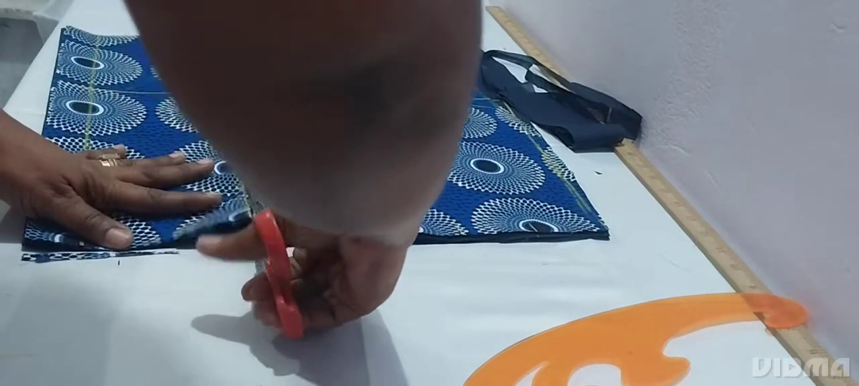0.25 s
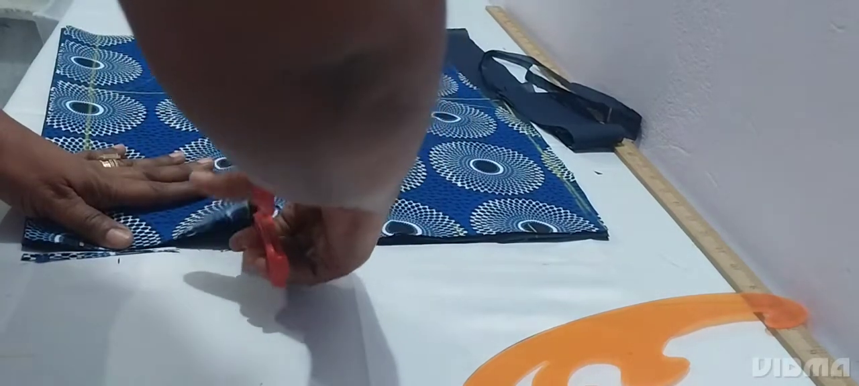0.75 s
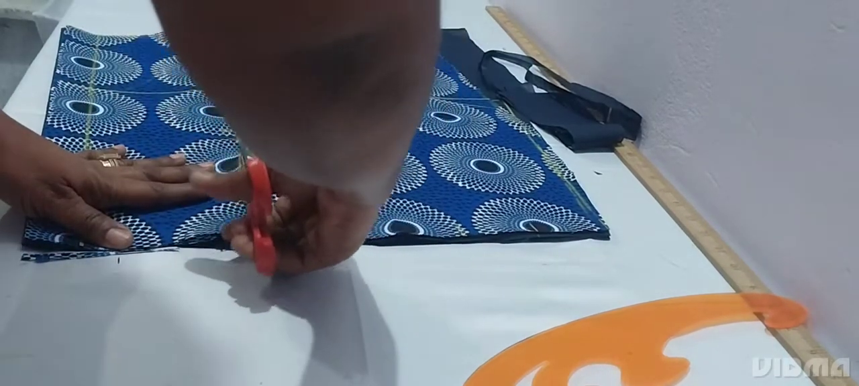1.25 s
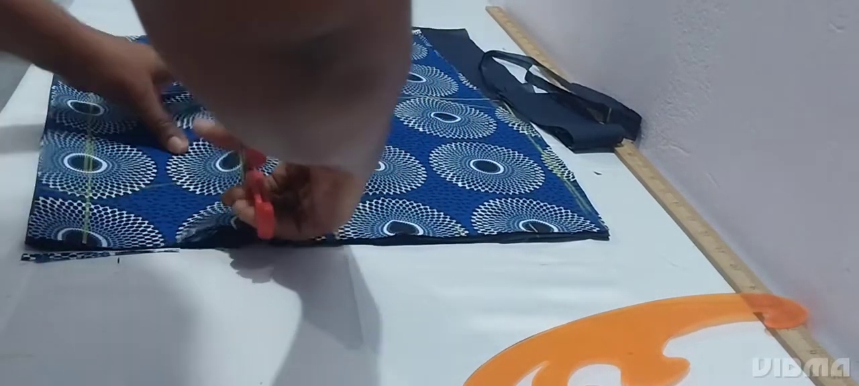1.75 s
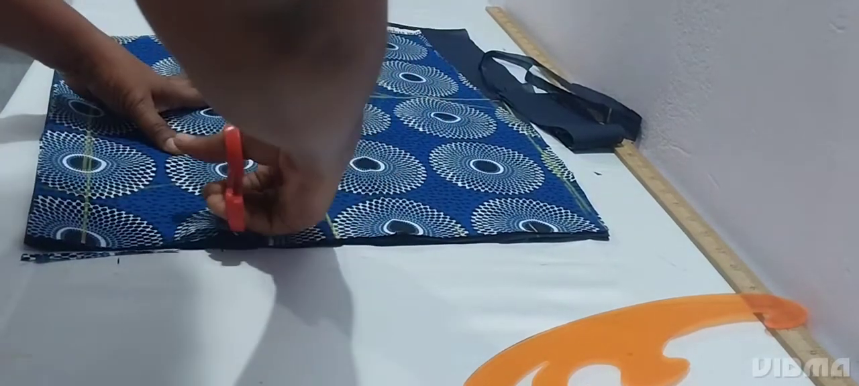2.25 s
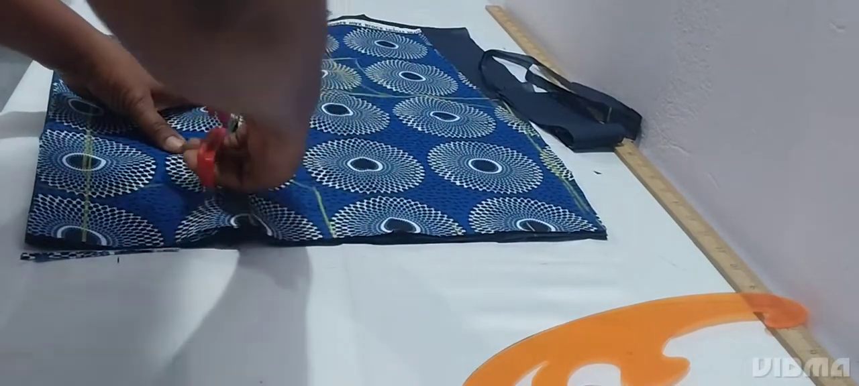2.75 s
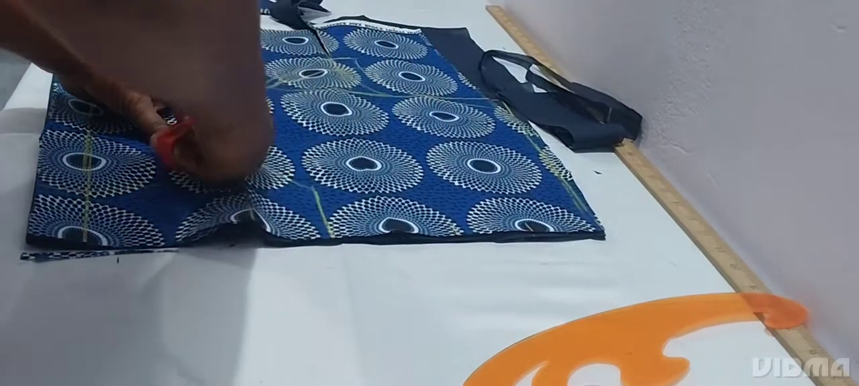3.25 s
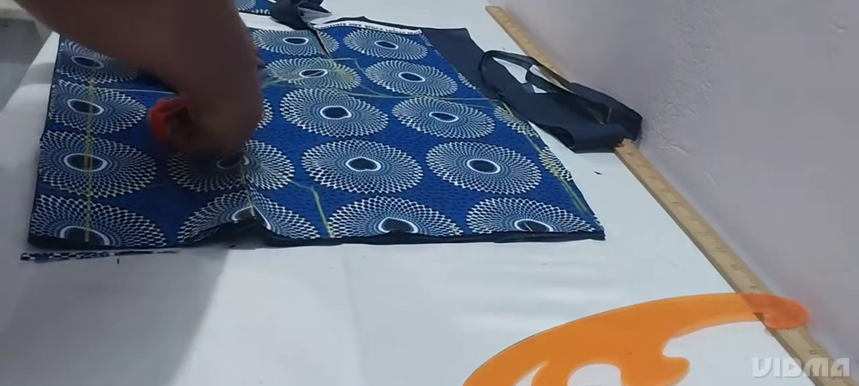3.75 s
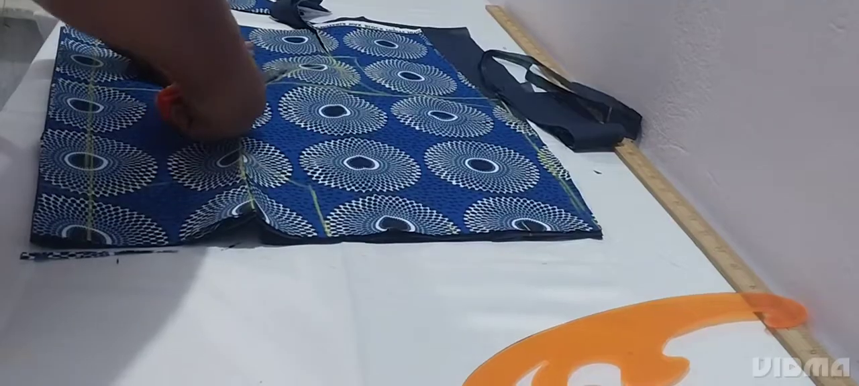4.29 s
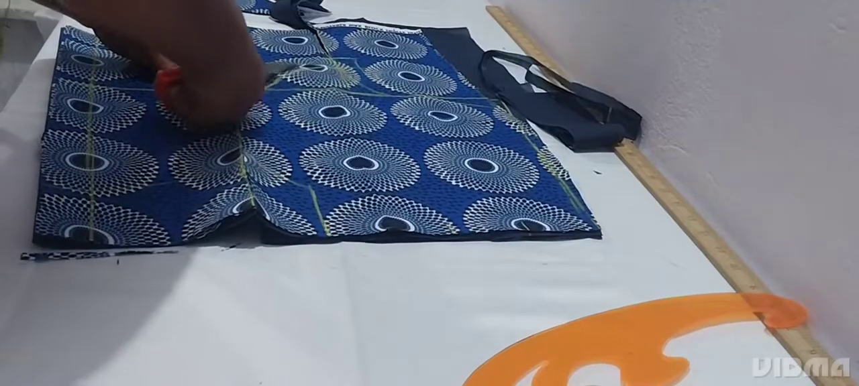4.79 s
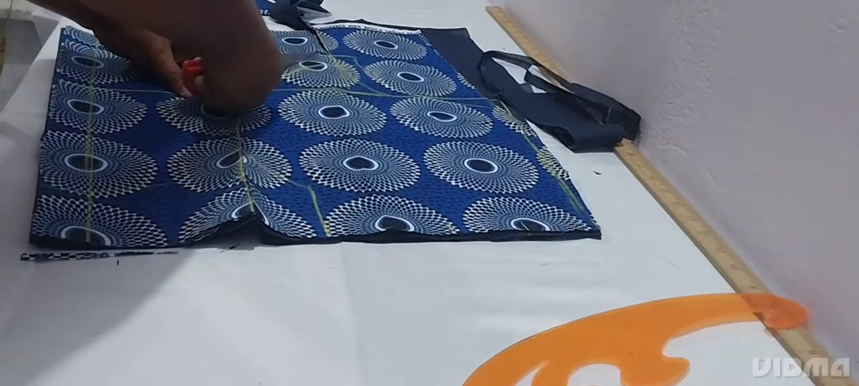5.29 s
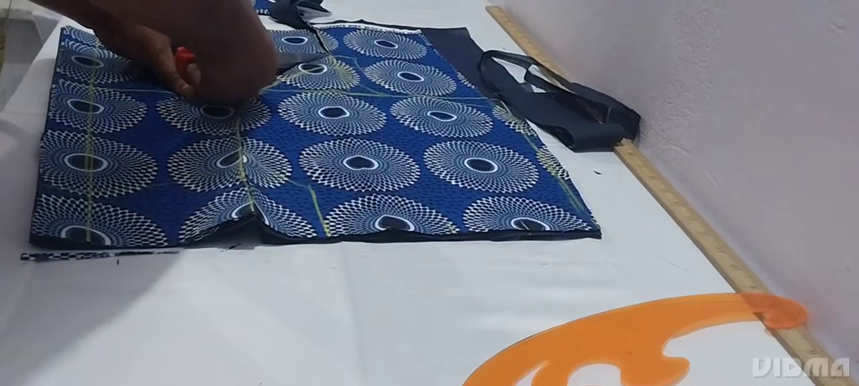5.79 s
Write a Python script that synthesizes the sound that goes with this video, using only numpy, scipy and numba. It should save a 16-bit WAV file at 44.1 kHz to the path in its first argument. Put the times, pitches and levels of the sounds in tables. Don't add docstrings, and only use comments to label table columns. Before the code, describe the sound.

Close, woody crunches of scissors cutting layered fabric on a tabletop, each followed by a faint blade slide, brisk and regular throughout.

```python
import sys
import numpy as np
from scipy import signal
from scipy.fft import rfft, irfft
from scipy.io import wavfile
from scipy.ndimage import uniform_filter1d, minimum_filter1d
from numba import njit

SR = 44100
rng = np.random.default_rng(int(sys.argv[2]) if len(sys.argv) > 2 else 0)


def to_wav(s):
    ch = np.atleast_2d(s).T
    pcm = np.round(np.clip(ch, -1, 1) * 32767)
    wavfile.write(sys.argv[1], SR, pcm.astype(np.int16))


def natural_amplitude(level_db):
    exponent = np.asarray(level_db, float) / 20
    return 10 ** exponent


N = 266035

# blades bite [t/s], full force lasts [s], board, upper board, table frame [level/dB]
CUTS = [(-.055, .055, -10, -10, -20), (0.2798, 0.052, -13.5, -10.5, -21),
        (0.6215, 0.044, -16.5, -14, -23.5), (0.9628, 0.035, -16, -20, -23.5),
        (1.2965, 0.02, -11, -18.5, -19.5), (1.637, 0.032, -19.5, -14.5, -21), (1.98, 0.036, -16, -15, -17),
        (2.33, .045, -12.5, -14.5, -17.5), (2.67, 0.04, -14, -14, -20), (3.018, 0.032, -15.5, -13, -19.5),
        (3.352, 0.035, -13, -11.5, -18), (3.706, 0.032, -14.5, -15, -21), (4.051, 0.046, -13.5, -12.5, -23),
        (4.4078, 0.039, -11, -11, -23), (4.7665, 0.046, -13, -16.5, -21), (5.1197, .055, -10, -21, -28),
        (5.4756, 0.03, -7.5, -20, -26), (5.8098, 0.049, -10.5, -26.5, -28)]
# shanks, legs rocking, low board, first touch of the fold [level/dB]
GRIP = [(-36, -25, -13, -60), (-31.5, -24.5, -14.5, -33), (-32, -29.5, -17.5, -27), (-39, -37, -18, -24),
        (-76, -48, -19.5, -50), (-38, -26, -15.5, -36), (-32.5, -28.5, -16, -31), (-56, -24, -17.5, -35.5),
        (-37, -33, -13.5, -49), (-28.5, -32, -17.5, -43), (-30.5, -29.5, -16, -52), (-32.5, -28, -14, -34),
        (-33.5, -39, -15.5, -29.5), (-28, -22.5, -17, -31), (-29, -30, -19.5, -41), (-30.5, -39, -21, -22),
        (-34.5, -43, -21, -29), (-33, -41, -22.5, -38)]
# centre [f/Hz], width [Hz], [level/dB]
FRAME = [(108.4, 26.9, 4), (150.8, 96, -1.5), (186, 32, 0)]
LOW_BOARD = [(219, 15.3, -2), (328.6, 22.4, 2), (375.4, 25, 0), (437, 100, -6.5)]
BOARD = [(582.5, 42, -1.5), (630.3, 40.7, 0), (720, 74, 0.5), (829.5, 33.6, -1.5)]
UPPER_BOARD = [(922, 62, -2), (1039, 58.7, 0.5), (1148, 53.4, -2.5), (1294, 128, -13)]
# centre [f/Hz], width [Hz], [level/dB]
HANDLES = [(1510, 164, 5), (1906, 200, 8), (2050, 218, 7.5), (2334, 110, 7), (2713, 293, -2)]
SHANKS = [(3070, 370, 4), (3510, 490, -1.5), (3654, 180, 1), (4480, 980, -20.5)]
BLADES = [(5330, 180, 5), (5950, 620, 0.5), (6905, 660, -1), (8750, 1540, -16)]
EDGES = [(8500, 260, -5), (11260, 3300, -10.5), (13400, 1200, -4)]


def level(x, db):
    return x * natural_amplitude(db) / np.sqrt(np.mean(x ** 2))


@njit
def svf(x, hz, width):
    out, band, low = np.empty(len(x)), 0., 0.
    for i in range(len(x)):
        g, damping = np.tan(np.pi * hz[i] / SR), width / hz[i]
        v = (band + g * (x[i] - low)) / (1 + g * (g + damping))
        band = 2 * v - band
        low = low + 2 * g * v
        out[i] = damping * v
    return out


def soft(x, hz):
    return signal.sosfilt(signal.butter(2, min(hz, SR / 3), fs=SR, output="sos"), x)


def walk(rate):
    held = int(SR / rate)
    steps = np.repeat(rng.standard_normal(N // held + 1), held)
    return 1.356 * uniform_filter1d(uniform_filter1d(steps, held), held)[:N]


def response(modes, x, wander=0., clump_db=0.):
    out = 0
    for k, (hz, width, db) in enumerate(modes):
        caught = x * natural_amplitude(clump_db * walk(45))
        mode = svf(caught, hz * (1 + wander * walk(6)), 1. * width)
        out = out + (-1) ** k * natural_amplitude(db) * mode
    return out


def ring(modes, force, db, wander=0.033, clump_db=0.):
    steady = response(modes, rng.standard_normal(N))
    return response(modes, force * natural_amplitude(db), wander, clump_db) / np.std(steady)


def strokes(starts):
    t = np.arange(N) / SR
    stroke = np.clip(np.searchsorted(starts - .065, t) - 1, 0, None)
    return stroke, t - starts[stroke]


def effort(since, hold, shape):
    full, rise, sag, longer, fall = shape
    held = np.maximum(hold + longer, 0)
    late = since - full
    loss = rise * np.maximum(-late, 0) + sag * np.clip(late, 0, held) + fall * np.maximum(late - held, 0)
    return -np.minimum(loss, 80)


def snaps(rate, scatter_db, patchy_db, fuzz):
    parted = rng.random(N) < rate / SR
    size = natural_amplitude(scatter_db * np.minimum(rng.exponential(size=N), 3.5))
    clicks = parted * size * np.sign(rng.standard_normal(N))
    force = level(clicks, 0) + fuzz * rng.standard_normal(N)
    return level(force * natural_amplitude(patchy_db * walk(90)), 0)


def room_floor():
    # [f/Hz], density [level/dB per Hz]
    room = [(18, -44), (30, -10), (113, 2), (448, -19), (716, -9), (1030, -13), (1970, -27), (15000, -46)]
    f = np.fft.rfftfreq(N, 1 / SR) + 1
    hz, db = np.transpose(room)
    colour = natural_amplitude(np.interp(np.log(f), np.log(hz), db))
    return level(irfft(rfft(rng.standard_normal(N)) * colour, N), -51.5)


def rustle():
    # start [t/s], end [t/s], centre [f/Hz], width [Hz], [level/dB]
    brushes = [
        (5.56, 6.1, 3150, 150, -64.),
        (5.61, 6.1, 1950, 200, -65),
        (5.66, 6.1, 1400, 120, -63.),
        (.05, 1.3, 6200, 1200, -79),
    ]
    t, out = np.arange(N) / SR, 0
    for start, end, hz, width, db in brushes:
        gate = uniform_filter1d(1. * ((t >= start) & (t <= end)), size=4000)
        band = svf(rng.standard_normal(N), np.full(N, 1. * hz), 1. * width)
        out = out + gate * level(band, db) * natural_amplitude(3.0 * walk(4.2))
    return out


def sliding():
    # full speed [t/s], lasts [s], scrape [level/dB], pitch [f/Hz], low board minus scrape [dB]
    slides = [(0.154, 0.036, -29.5, 760, -1.5), (0.485, .04, -26.5, 804, -7.5),
              (0.835, 0.027, -27.5, 638, -5.5), (1.182, 0.023, -24, 678, -8.5),
              (1.519, 0.025, -31, 664, -15), (1.847, 0.035, -24, 664, -5), (2.195, 0.027, -27, 692, -17.5),
              (2.537, 0.022, -27.5, 693, -18.5), (2.902, 0.029, -29.5, 650, -21),
              (3.242, 0.028, -31, 593, -20), (3.583, 0.023, -30, 584, -26), (3.921, .04, -29.5, 633, -13),
              (4.293, 0.032, -27, 647, -20), (4.646, 0.048, -30, 697, -11), (5.003, 0.03, -24, 706, -12),
              (5.361, 0.022, -29, 684, -9), (5.713, 0.015, -25.5, 643, -17)]
    # [t/s], upper board minus scrape [level/dB]
    from_edge = [
        (.1, -8.5),
        (.75, -7),
        (1.2, -23.5),
        (3.1, -30),
        (3.6, -18.5),
        (5.8, -36.5),
    ]
    # full after start [t/s], rise [dB/s], sag [dB/s], held longer [s], fall [dB/s]
    scrape_shape = (0.001, 780, 57, 0.00082, 730)
    board_shape = (0.00089, 440, 21, 0.0095, 330)
    stroke, since = strokes(np.array(slides)[:, 0])
    _, hold, full_db, hz, low = np.array(slides)[stroke].T
    scrape_db = full_db + effort(since, hold, scrape_shape)
    board_db = full_db + effort(since, hold, board_shape)
    upper = np.interp(np.arange(N) / SR, *np.transpose(from_edge))
    rub = snaps(500., 0.8, 1.6, 0.74)
    hiss = rng.standard_normal(N)
    width = 81.0
    narrow = svf(rub * natural_amplitude(scrape_db), hz, width)
    scrape = svf(narrow, hz, 3.7 * width) * np.sqrt(SR / np.pi / width)
    board = ring(UPPER_BOARD, rub, board_db + upper - .1)
    board += ring(BOARD, rub, board_db + 0.8 * upper + 2.0)
    board += ring(LOW_BOARD, rub, board_db + low - .1)
    board += ring(FRAME, rub, board_db + low - 12.0)
    steel = ring(HANDLES + SHANKS, hiss, board_db - 38.0)
    steel += ring(BLADES, hiss, board_db + 0.64 * upper - 30.5)
    return soft(1.1 * scrape + board, 1300.0) + steel


def impulses(events, gain_db):
    force = np.zeros(N)
    s, db = np.transpose(events)
    force[(s * SR).astype(int)] = natural_amplitude(db + gain_db)
    return force


def jolts():
    # [t/s], peak [level/dB]
    seams = [(0.288, -4), (0.635, 9), (0.658, 19.5), (0.968, -7), (1.303, 0), (1.319, -3), (1.647, 12),
             (1.985, -12), (2.03, -4), (2.335, 16.5), (2.672, 3), (2.684, -2), (3.03, -15), (3.358, -13),
             (3.406, 11), (3.709, -13), (3.782, 12), (4.047, -6), (4.06, -8), (4.41, -1), (4.463, -9),
             (4.776, 18.5), (5.096, -29), (5.123, -15), (5.132, 15.5), (5.48, -10), (5.492, 5),
             (5.819, -14), (5.867, 7)]
    # [t/s], peak [level/dB]
    ticks = [(0.3555, -21.5), (0.6818, -25), (0.9963, -19), (1.336, -14.5), (1.6985, -34), (1.746, -34),
             (2.0136, -14), (2.363, -42), (2.4035, -15.5), (2.734, -20), (3.067, -19), (3.4044, -31),
             (3.779, -33), (4.0925, -36), (4.4598, -20.5), (4.849, -24), (5.1801, -20), (5.195, -16),
             (5.4947, -20), (5.5106, -12), (5.8237, -35), (5.842, -18), (5.8693, -26)]
    push = impulses(seams, 18.)
    body = response(BOARD + UPPER_BOARD, push, 0.034) + natural_amplitude(-35.0) * response(HANDLES, push, 0.027)
    burst = rng.standard_normal(200) * np.exp(-np.arange(200) / 52.0)
    tick = np.convolve(impulses(ticks, 8.), burst)[:N] / 2.2
    steel = response(BLADES, tick) + natural_amplitude(-13.5) * response(EDGES, tick)
    steel += natural_amplitude(-3.0) * response(SHANKS + HANDLES, tick)
    return soft(body, 1640.0) + steel


def cut_table(threads, stroke, since):
    # full after bite [t/s], rise [dB/s], sag while held [dB/s], held longer [s], fall [dB/s]
    board_shape = (0.0045, 1330, 32, 0.009, 392)
    upper_shape = (0.0083, 1470, 13.3, 0.0069, 246)
    low_shape = (0.013, 840, 143, 0.018, 336)
    frame_shape = (.001, 740, 14, 0.034, 384)
    touch_shape = (0.0015, 950, 100, 0.011, 900)
    set_down_shape = (0.001, 1500, 50, .015, 700)
    # [t/s], frame [level/dB]
    set_down = [
        (1.63, -30),
        (2.318, -24),
        (2.658, -22),
        (3.342, -24),
        (4.036, -19),
        (4.388, -18),
        (4.752, -23.5),
    ]
    # centre [f/Hz], width [Hz], [level/dB]
    legs = [(54.6, 7.6, 0)]
    _, hold, board_db, upper_db, frame_db = np.array(CUTS)[stroke].T
    _, rock_db, low_db, touch_db = np.array(GRIP)[stroke].T
    touch_db = touch_db + effort(since + 0.023, 0, touch_shape)
    board_db = np.maximum(board_db + effort(since, hold, board_shape), touch_db)
    down, since_down = strokes(np.array(set_down)[:, 0])
    down_db = np.array(set_down)[down, 1] + effort(since_down, 0, set_down_shape)
    frame_db = np.maximum(frame_db + effort(since, hold, frame_shape), down_db)
    rock_db = rock_db - np.minimum(3.3 * ((since - .05) / 0.041) ** 2, 60)
    table = ring(BOARD, threads, board_db)
    table += ring(UPPER_BOARD, threads, upper_db + effort(since, hold, upper_shape))
    table += ring(FRAME, threads, frame_db, wander=0.027)
    table += ring(legs, threads, rock_db)
    table += ring(LOW_BOARD, threads, 2.5 + low_db + effort(since, hold, low_shape))
    return soft(table, 1800.0)


def cut_steel(threads, fine, stroke, since):
    # blades [level/dB], handle ring [level/dB], [f/Hz], edge [level/dB], [f/Hz]
    colour = [(-41, -15.5, 2410, -52, 10700), (-37, -17.5, 1770, -46, 10240),
              (-34.5, -16, 2510, -46.5, 17000), (-35, -19.5, 1700, -47, 11200),
              (-39, -15.5, 2375, -60, 9560), (-35, -15.5, 2130, -47, 11100), (-40, -20, 2030, -48, 13000),
              (-39.5, -15.5, 2350, -52.5, 18000), (-37.5, -19, 2430, -45, 10000),
              (-41.5, -20.5, 2230, -44, 6300), (-42.5, -22.5, 2330, -44, 12000),
              (-42, -21, 4500, -42, 13000), (-40.5, -23.5, 2060, -48.5, 9940),
              (-39.5, -19, 1500, -48.5, 12000), (-41, -17.5, 1900, -52, 13000),
              (-42, -21.5, 1950, -46, 14350), (-40.5, -21.5, 2370, -50, 13600),
              (-37.5, -22.5, 2264, -55, 16000)]
    # full after bite [t/s], rise [dB/s], sag while held [dB/s], held longer [s], fall [dB/s]
    handle_shape = (.013, 1300, 50, .015, 225)
    shank_shape = (.015, 1300, 80, .008, 260)
    blade_shape = (.03, 430, 40, -.012, 265)
    edge_shape = (.012, 1400, 90, -.004, 370)
    hold = np.array(CUTS)[stroke, 1]
    shank_db = np.array(GRIP)[stroke, 0]
    blade_db, handle_db, handle_hz, edge_db, edge_hz = np.array(colour)[stroke].T
    mixed = 0.48 * threads + 0.64 * fine
    grip_db = effort(since, hold, handle_shape)
    handles = ring(HANDLES, mixed, 0.61 * handle_db - 17.5 + grip_db, clump_db=3.5)
    handles += svf(mixed * natural_amplitude(handle_db + 8.0 + 1.33 * grip_db), handle_hz, 84.0)
    shanks = ring(SHANKS, mixed, shank_db - 7.0 + effort(since, hold, shank_shape), clump_db=5.0)
    edge_force = fine * natural_amplitude(edge_db - 7.0 + effort(since, hold, edge_shape))
    rising_hz = edge_hz * (1 + .6 * np.clip(since - .015, -.03, .06))
    edges = ring(EDGES, edge_force, 1.7, clump_db=4.5) + 3.6 * svf(edge_force, rising_hz, 1100.)
    before_bite_db = 1300 * np.maximum(-since, 0)
    blade_db = blade_db + effort(since, hold, blade_shape) - before_bite_db
    blades = ring(BLADES, fine + 0.12 * threads, blade_db - 1.5, wander=.018, clump_db=3.5)
    return soft(handles + shanks, 5500.) + blades + edges


def cutting():
    stroke, since = strokes(np.array(CUTS)[:, 0])
    threads = snaps(900., 2.5, 1.22, 0.44)
    fine = snaps(2500., 0.79, 2.82, 0.94)
    return cut_table(threads, stroke, since) + cut_steel(threads, fine, stroke, since)


def scene():
    near = cutting() + jolts() + sliding()
    t60_s, tail_db = 0.15, -11
    t = np.arange(SR // 2) / SR
    tail = rng.standard_normal(len(t)) * np.exp(-np.log(1000) * t / t60_s) * (t > .005)
    wet = soft(signal.fftconvolve(near, tail / np.linalg.norm(tail))[:N], 8000.0)
    return (near + natural_amplitude(tail_db) * wet + rustle() + room_floor())[None]


def low_pass(x):
    return signal.sosfilt(signal.butter(12, 15740, fs=SR, output="sos"), x)


def record(dry):
    x = signal.sosfilt(signal.butter(3, 38., "highpass", fs=SR, output="sos"), dry)
    room_left = np.minimum(1, .97 / (np.abs(x) + 1e-9))
    x = x * uniform_filter1d(minimum_filter1d(room_left, size=129), size=129)
    x = signal.sosfilt(signal.ellip(8, .2, 60, 15450, fs=SR, output="sos"), x)
    return low_pass(x)


dry = scene()
out = record(dry)
to_wav(out)
```